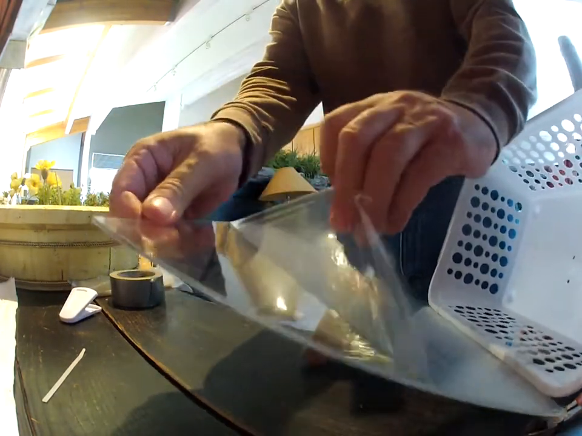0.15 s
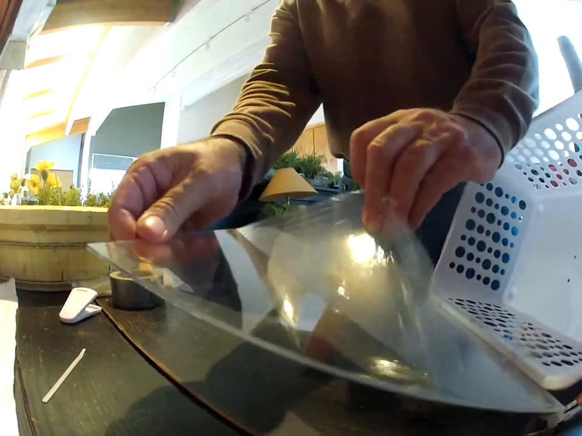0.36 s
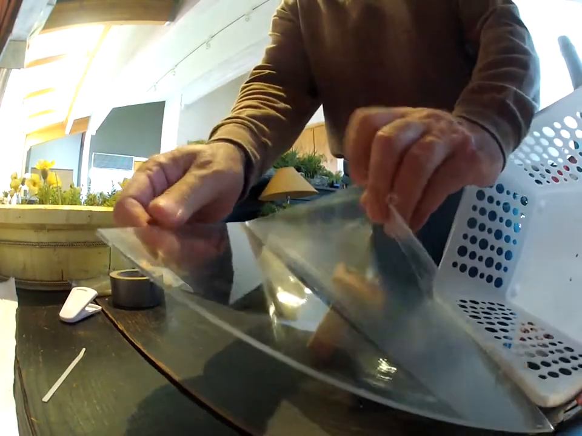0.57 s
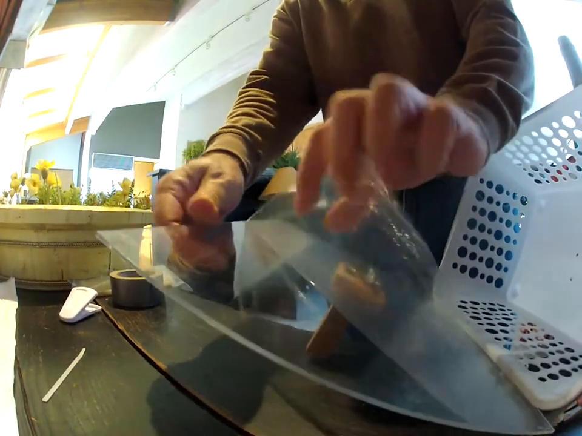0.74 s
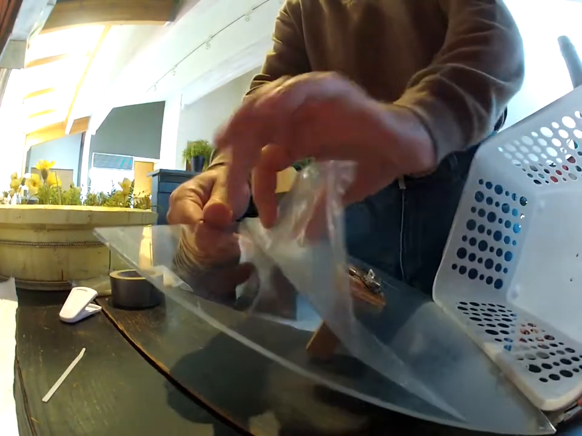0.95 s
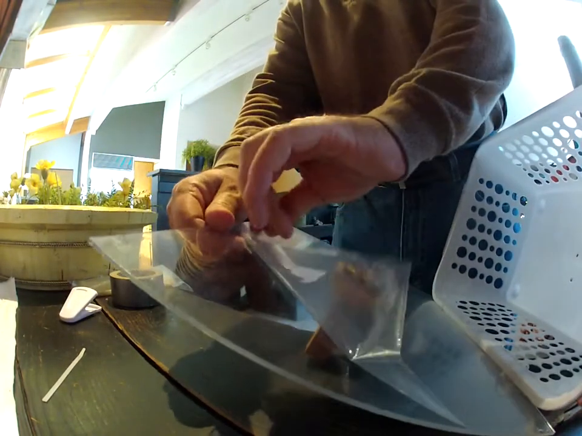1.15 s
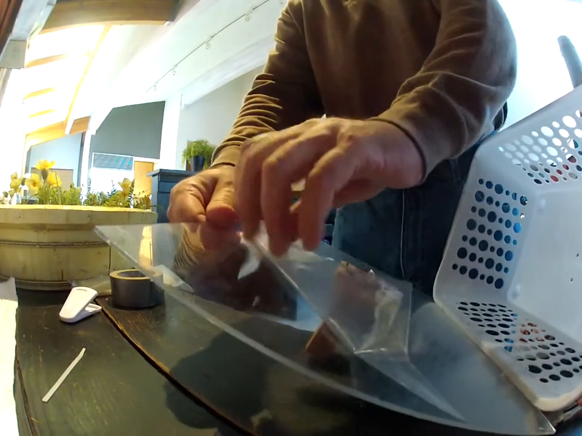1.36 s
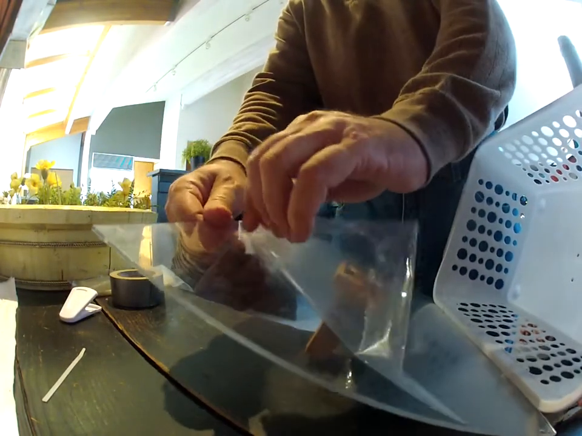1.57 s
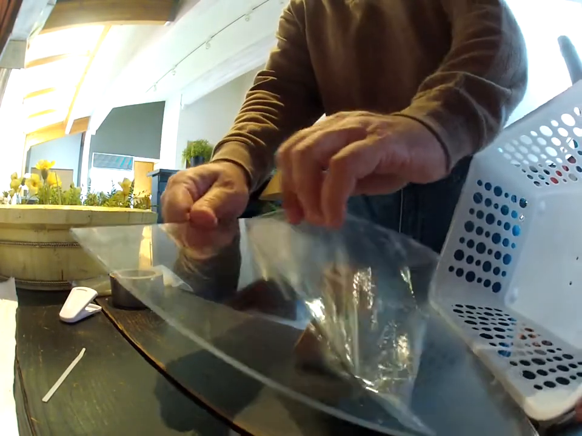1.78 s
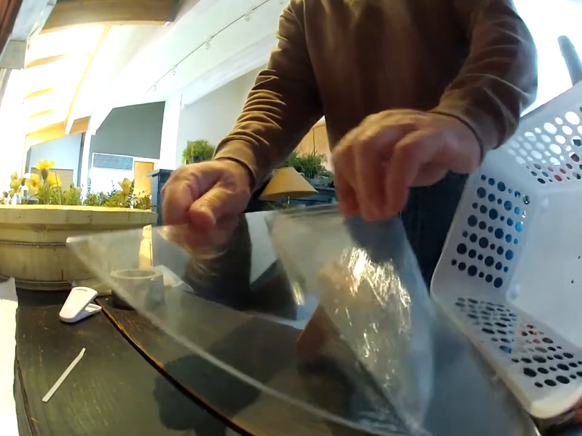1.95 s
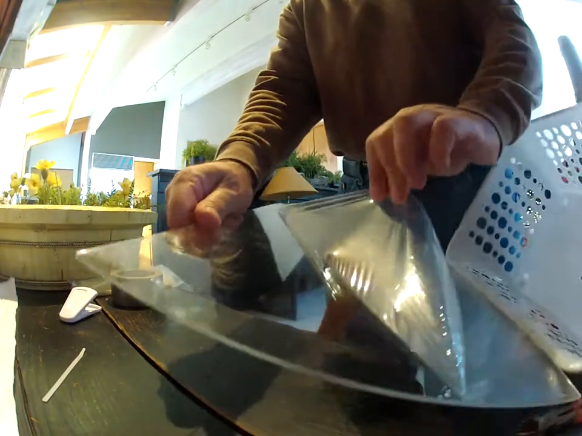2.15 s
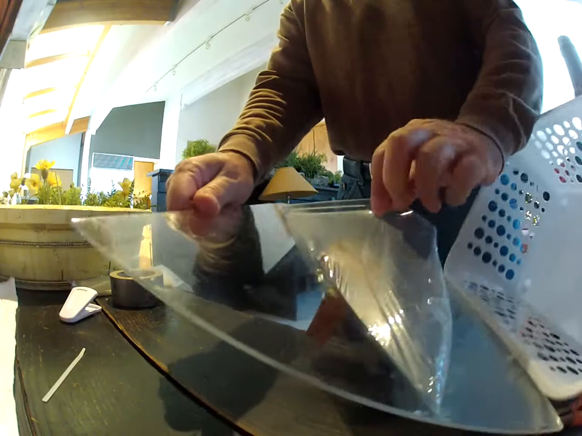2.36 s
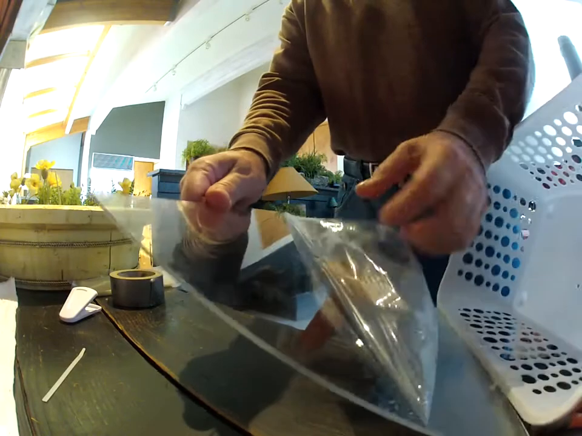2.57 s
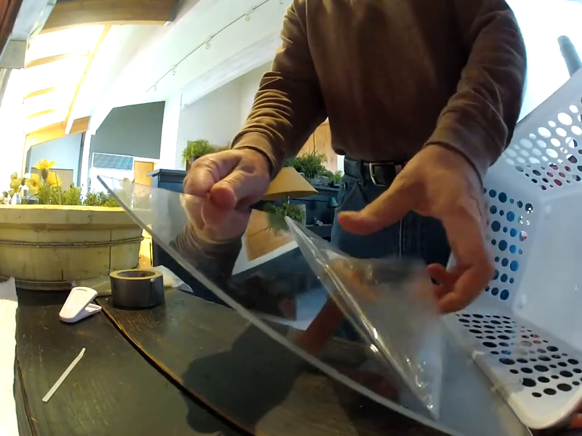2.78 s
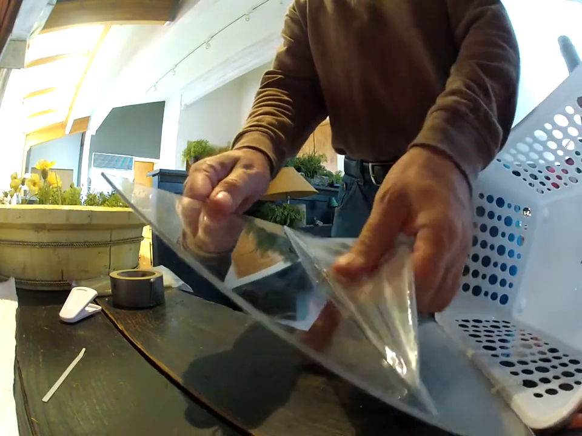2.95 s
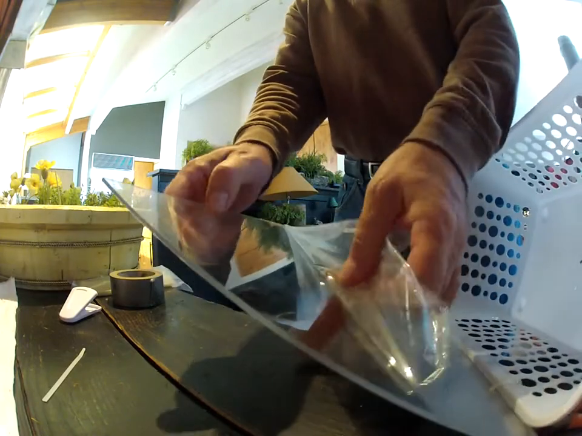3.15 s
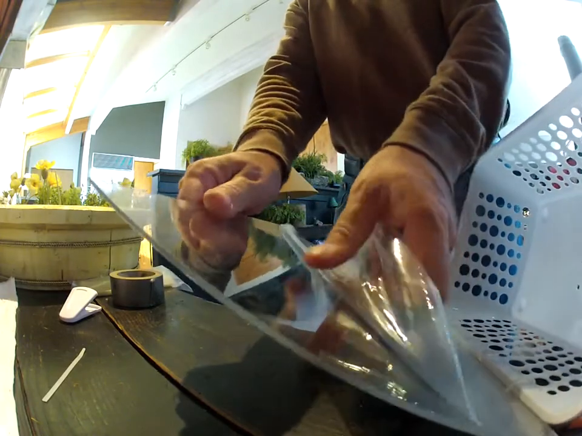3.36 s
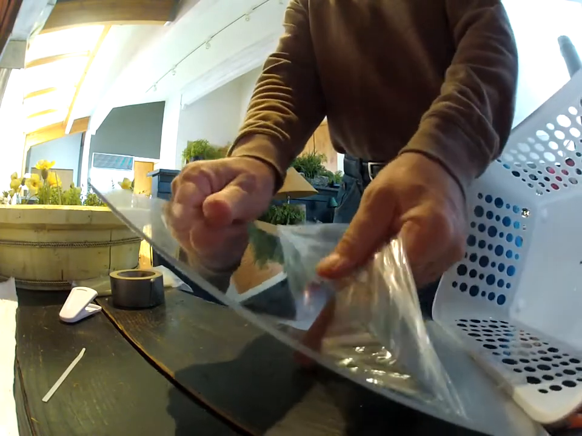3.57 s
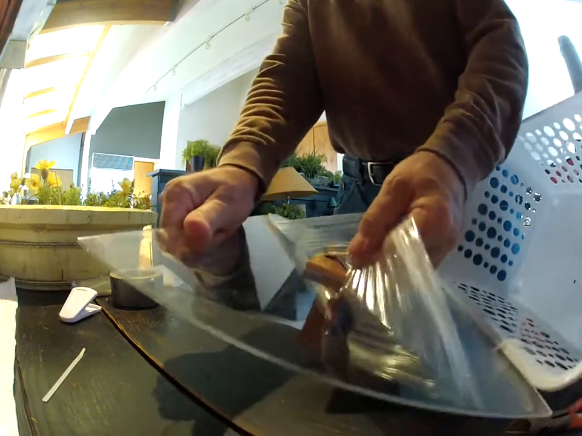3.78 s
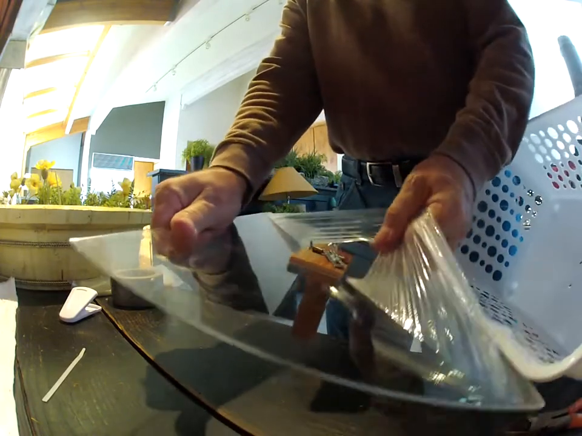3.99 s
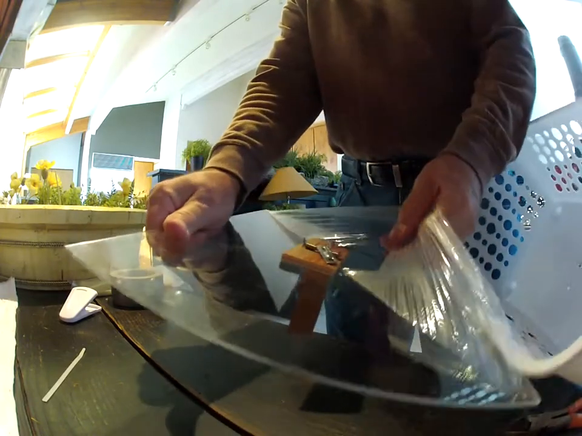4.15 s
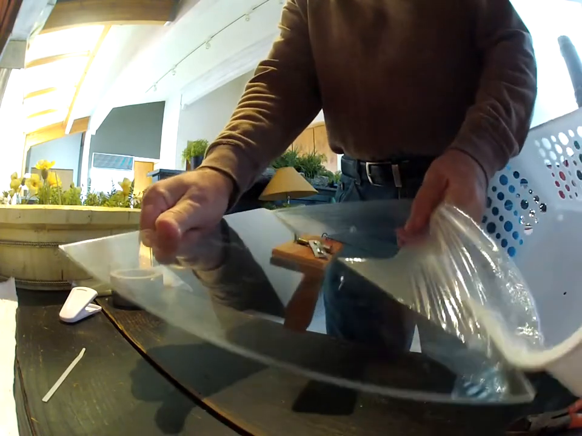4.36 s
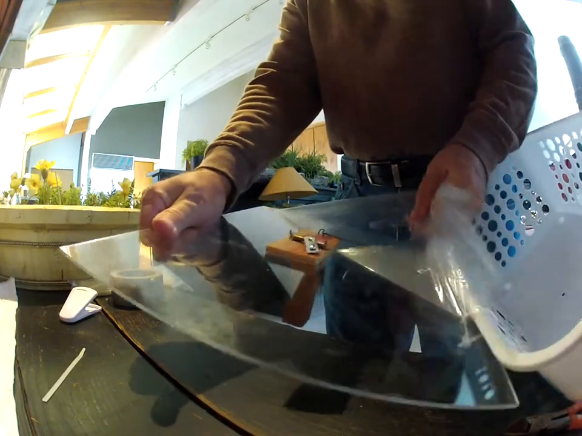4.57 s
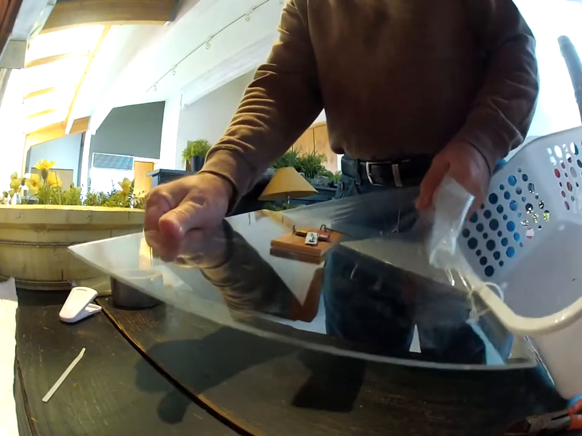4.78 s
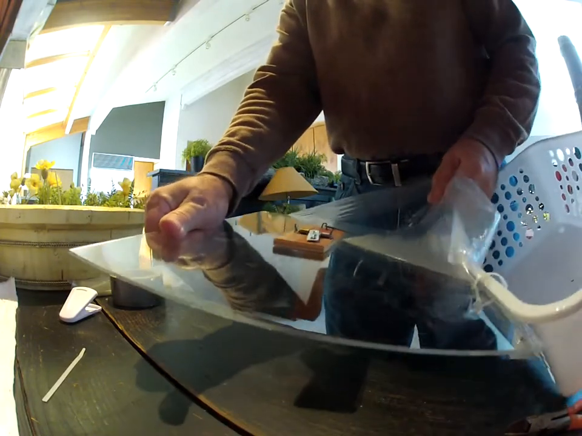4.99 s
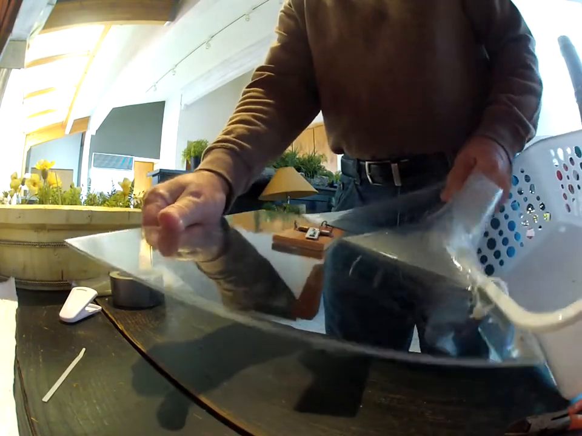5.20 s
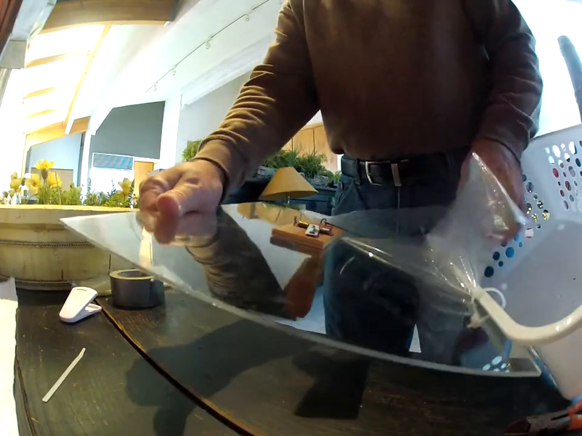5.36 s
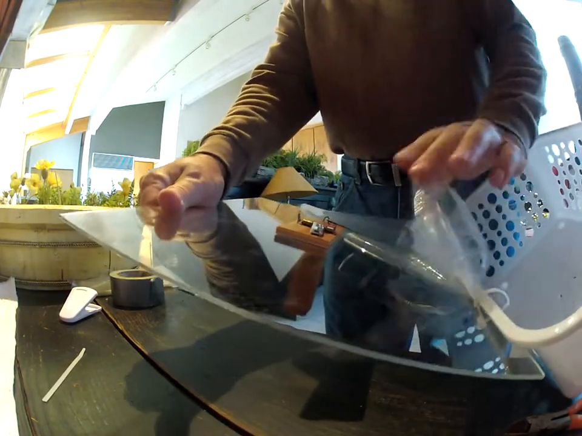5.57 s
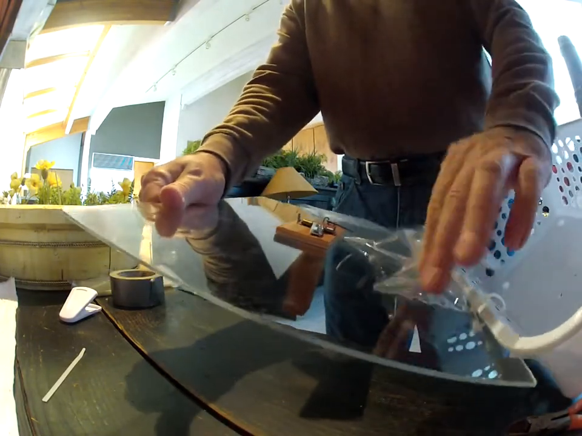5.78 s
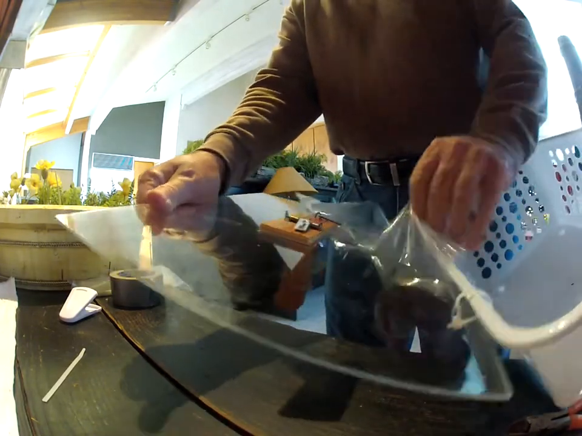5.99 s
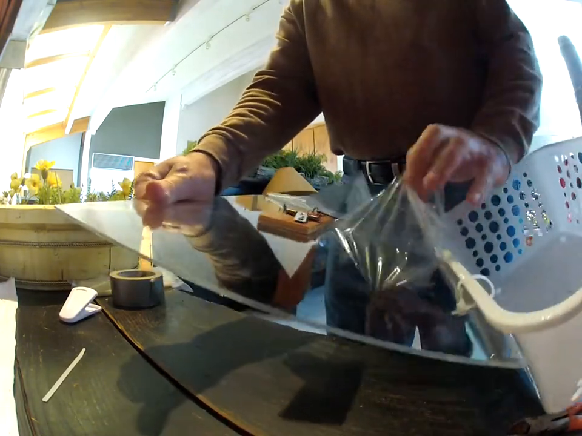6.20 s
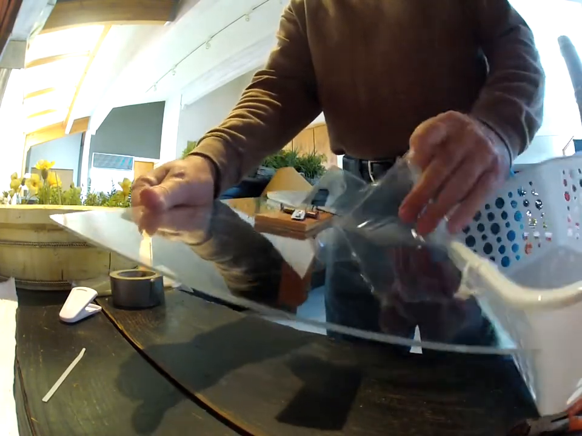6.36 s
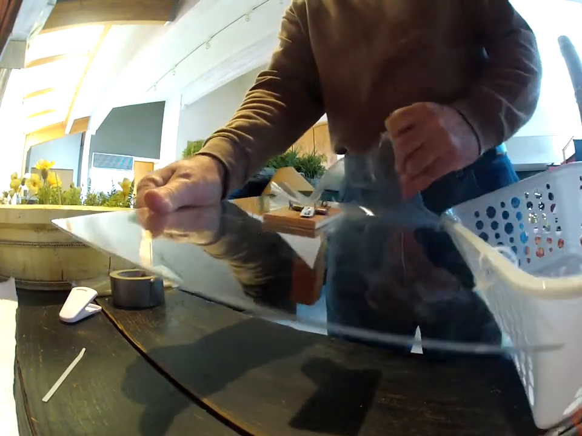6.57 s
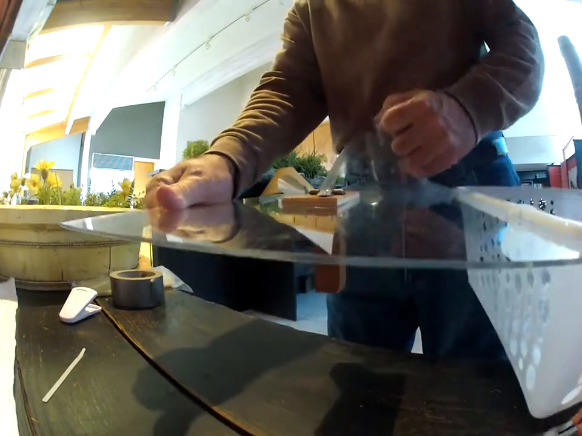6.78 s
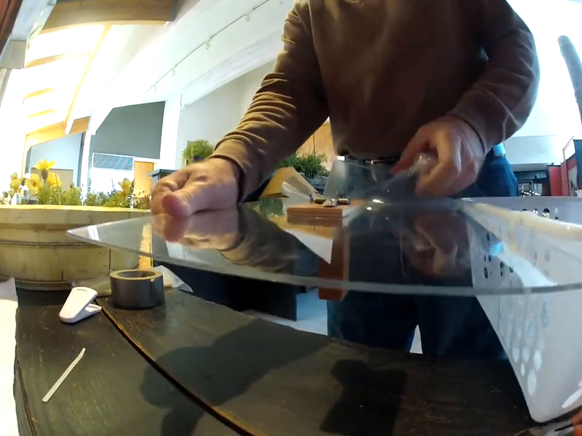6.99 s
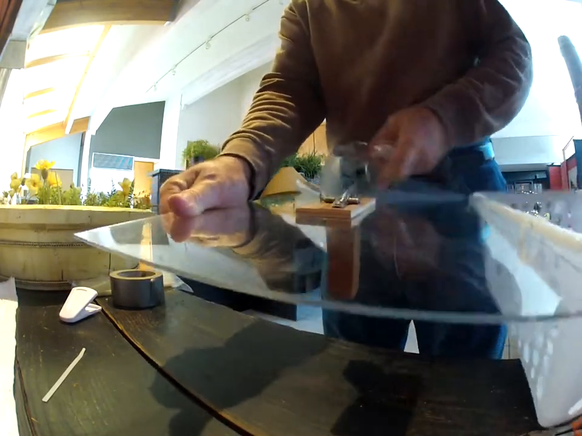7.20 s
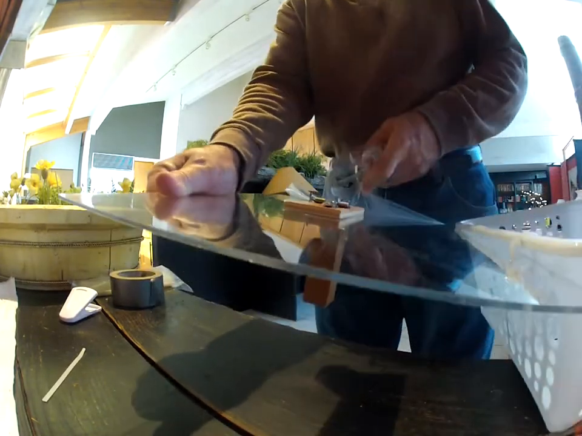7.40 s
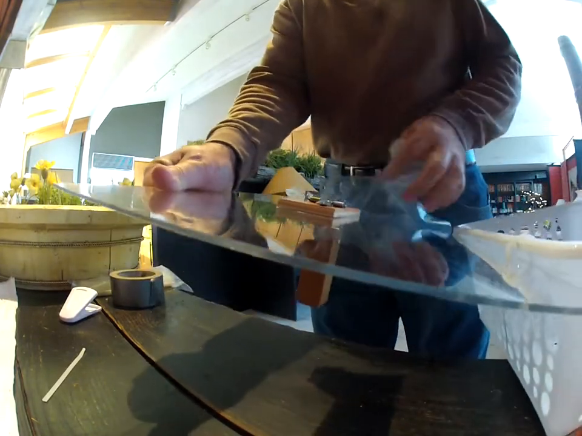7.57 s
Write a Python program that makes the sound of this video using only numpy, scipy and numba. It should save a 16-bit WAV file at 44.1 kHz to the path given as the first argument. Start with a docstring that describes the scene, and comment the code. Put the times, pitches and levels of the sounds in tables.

```python
"""Sharp cracks, low thumps and crinkling: a hand peels clinging film off a stiff plastic sheet in a room.
The glue lets go by stick-slip: each slip snaps and tears as filtered noise, thumps the taut film as
dying sines and rings the sheet's modes. Loose film crinkles as a random train of tiny noise grains.
The flexing sheet rumbles as resonant noise, and its knocks ring a basket with a small hard rattle.
Coupled delay lines reverberate, shaped noise hums, thin sines are the recorder's faint electronic whine."""
import sys
import numpy as np
from scipy import signal
from scipy.fft import rfft, irfft
from scipy.io import wavfile
from scipy.ndimage import uniform_filter1d
from numba import njit

SR = 44100
rng = np.random.default_rng(int(sys.argv[2]) if len(sys.argv) > 2 else 0)


def digitize_waveform(pressure):
    """Quantize a signal to 16-bit integers and store it at the path in sys.argv[1].

    Rows of a 2-D input are taken as channels; values are limited to [-1, 1].
    """
    field = np.atleast_2d(pressure).T
    bounded = np.clip(field, -1, 1)
    quanta = np.round(bounded * 32767).astype(np.int16)
    wavfile.write(sys.argv[1], SR, quanta)


N = 336924

FILM_BAND_HZ = (350, 7500)  # shared by cracks and crinkles


def undb(db):
    """Decibel law: 20 dB is a factor of ten in amplitude."""
    return 10 ** (np.asarray(db) / 20)


def level(x, db):
    """Normalisation: scale a signal to a given rms level in dB."""
    return x * undb(db) / np.sqrt(np.mean(x ** 2))


def band(x, lo_hz, hi_hz):
    """Band limiting: a Butterworth band-pass."""
    sos = signal.butter(2, [lo_hz, min(hi_hz, .45 * SR)], "band", fs=SR, output="sos")
    return signal.sosfilt(sos, x)


def resonate(x, hz, width):
    """Resonance: a two-pole peak with gain 1 at its centre, width in Hz."""
    return signal.lfilter(*signal.iirpeak(hz, hz / width, fs=SR), x)


def ring(x, modes):
    """Modal vibration: every push in x starts decaying sines."""
    out = 0
    for hz, db, t60 in modes:
        pole = np.exp(2j * np.pi * hz / SR - np.log(1000) / (t60 * SR))
        out = out + undb(db) * signal.lfilter([1], [1, -pole], x).imag
    return out


def add(track, s, piece):
    """Superposition: sum a piece into a track from s seconds on."""
    i = int(s * SR)
    track[i:i + len(piece)] += piece[:N - i]


def walk(rate):
    """Slow fluctuation: random levels held 1 / rate seconds, then slewed; spread near 1."""
    hold = int(SR / rate)
    steps = np.repeat(rng.standard_normal(N // hold + 1), hold)
    return 0.76 * uniform_filter1d(steps, hold)[:N]


# Thin steady tones. Each row: frequency in Hz, rms level in dB.
WHINE_TONES = [(5039, -75), (5087, -80), (6912, -88.5), (6961, -75)]


def electronic_whine():
    """Pure tones: steady sines are the recorder's faint electronic whine."""
    time = np.arange(N) / SR
    return sum(np.sqrt(2) * undb(db) * np.sin(2 * np.pi * hz * time) for hz, db in WHINE_TONES)


# Spectrum of the air and house noise.
# Each row: frequency in Hz, relative spectral density in dB per Hz.
AIR_SPECTRUM = [(15, -48), (25, 27.5), (140, 22.5), (368, 16.5), (1020, -4.5), (2060, -18), (4260, -70),
                (5140, -35.5), (6050, -16), (6920, -30), (15500, -36.5)]
AIR_DB = -51


def room_hum():
    """Shaped noise: air and house noise with a fixed spectrum and a slightly wandering level."""
    hz, db = np.transpose(AIR_SPECTRUM)
    grid = np.maximum(np.fft.rfftfreq(N, 1 / SR), 1)
    shape = undb(np.interp(np.log(grid), np.log(hz), db))
    air = irfft(rfft(rng.standard_normal(N)) * shape, N)
    return level(air, AIR_DB) * undb(0.63 * walk(8.8))


# After each slip film and sheet keep shaking: levels against the slip in dB, decay times in s
SETTLE_CRINKLE_DB, SETTLE_RUMBLE_DB, SETTLE_SWAY_DB = -41, -31.5, -34.5
SETTLE_CRINKLE_T60_S, SETTLE_SHEET_T60_S = 0.78, 0.63


def settling(rows, db, t60):
    """Energy decay: the powers left by the slips add up and die away exponentially."""
    power = np.zeros(N)
    for s, slip_db, _ in rows:
        add(power, s, np.array([undb(2 * (slip_db + db))]))
    decay = np.exp(-2 * np.log(1000) / (t60 * SR))
    return np.sqrt(signal.lfilter([1], [1, -decay], power))


# Loose film brushed or folded; a row sounds only if it ends after it starts.
# Each row: start in seconds, end in seconds, crinkle level in dB.
RUSTLE_SPANS = [(0.56, 0.548, -31), (0.707, 0.785, -47), (0.825, 0.837, -56), (0.97, 1.057, -60),
                (1.331, 1.379, -59), (1.434, 1.438, -45), (1.467, 1.526, -48.5), (2.266, 2.286, -49),
                (2.55, 2.6, -62), (2.734, 2.783, -52), (2.834, 2.922, -49), (3.073, 3.312, -55),
                (3.392, 3.458, -51), (3.502, 3.555, -41), (5.212, 5.365, -57), (5.575, 5.643, -46.5),
                (5.732, 5.798, -36), (5.863, 5.949, -31), (6.036, 6.073, -53), (6.248, 6.28, -42),
                (6.317, 6.348, -32), (6.377, 6.434, -42), (6.71, 6.732, -49), (6.784, 6.856, -49),
                (6.903, 6.955, -41), (6.997, 7.049, -39), (7.078, 7.106, -35.5), (7.248, 7.316, -59),
                (7.405, 7.654, -43)]


def crinkling(rows, steady):
    """Impulsive noise: loose film crinkles in tiny snaps of very uneven size, each a dying noise grain."""
    strength = steady + settling(rows, SETTLE_CRINKLE_DB, SETTLE_CRINKLE_T60_S)
    time = np.arange(N) / SR
    brushed = sum(undb(db) * ((time > start) & (time < end)) for start, end, db in RUSTLE_SPANS)
    chance = 600 / SR * undb(4.5 * walk(60))  # of a snap, per sample
    size = undb(4.0 * np.minimum(rng.exponential(size=N), 3.5))
    snaps = (rng.random(N) < chance) * size
    smear = np.exp(-np.arange(SR // 100) / (0.0016 * SR))
    grain = rng.standard_normal(N) * (signal.fftconvolve(snaps, smear)[:N] + 0.75)
    crinkle = level(band(grain, *FILM_BAND_HZ), 0)
    return (strength + uniform_filter1d(brushed, SR // 100)) * crinkle


# Broad flexing resonances of the sheet, each filtered a second time at twice the width.
# Each row: frequency in Hz, width of the first filter in Hz, relative level in dB.
FLEX_MODES = [(66.4, 29, -6), (169, 80, 11), (301, 260, 11.5), (640, 1100, 2.5)]
SWAY_HZ, SWAY_WIDTH_HZ = 117, 21.6  # lowest sheet mode
SWAY_DB = -4.5  # against the rumble, for steady handling
LEANS_S, LEAN_DB = 3.97, 5  # from then on the sheet leans on the basket and sways louder by this


def rumbling(rows, moved):
    """Forced vibration: irregular shoves drive the broad flexing and the lowest mode of the sheet."""
    time = np.arange(N) / SR
    shake = moved + settling(rows, SETTLE_RUMBLE_DB, SETTLE_SHEET_T60_S)
    sway = undb(SWAY_DB) * moved + settling(rows, SETTLE_SWAY_DB, SETTLE_SHEET_T60_S)
    sway = sway * undb(LEAN_DB * (time > LEANS_S))
    shove = rng.standard_normal(N) * undb(2.5 * walk(30))
    flexing = sum(level(resonate(resonate(shove, hz, width), hz, 2 * width), db)
                  for hz, width, db in FLEX_MODES)
    lowest = resonate(shove, SWAY_HZ, SWAY_WIDTH_HZ)
    return shake * level(flexing, 0) + sway * level(lowest, 0)


# Strength of the steady handling, interpolated between rows.
# Each row: time in seconds, crinkle level in dB, sheet rumble level in dB.
HAND_LEVELS = [(0, -57, -29), (.75, -69.5, -55), (1.099, -65.5, -59), (1.501, -69, -55), (2.2, -78, -49),
               (2.29, -52.5, -45.5), (2.6, -61.5, -57.5), (2.9, -63, -53), (3.2, -56, -48.5),
               (3.5, -50.5, -47), (5.3, -58.5, -49), (5.499, -66, -61), (5.8, -36, -60),
               (5.97, -43.5, -40.5), (6.22, -61, -45), (6.45, -40, -63), (6.6, -64, -56),
               (6.85, -47.5, -40), (6.98, -51, -51), (7.2, -45, -38.5), (7.46, -63, -58), (7.64, -56, -44)]


def handling(rows):
    """Amplitude modulation: the hand's strength scales the film's crinkle and the sheet's rumble."""
    s, *columns = np.transpose(HAND_LEVELS)
    time = np.arange(N) / SR
    steady, moved = (undb(np.interp(time, s, column)) for column in columns)
    return crinkling(rows, steady) + rumbling(rows, moved)


# Ringing modes of the basket.
# Each row: frequency in Hz, relative level in dB, time to fall 60 dB in seconds.
BASKET_MODES = [(121.1, -35, .12), (246, 1.5, 0.047), (361, 0, 0.091), (536, 1.5, 0.029), (650, 4, 0.029),
                (1033.5, -10, 0.039)]
# The sheet bumps the basket.
# Each row: start in seconds, relative blow level in dB, rattle level against the blow in dB.
BASKET_KNOCKS = [(1.514, -36, -40), (2.28, -32, -57), (2.89, -35.5, -36), (3.15, -35, -40),
                 (5.1716, -11, -20.5), (5.9376, -9.5, -23), (6.071, -31, -30), (6.632, -23.5, -40),
                 (6.78, -30, -40)]


def knocks():
    """Impact excitation: dull blows ring the basket's modes; something small and hard rattles along."""
    blow, rattle, thud = np.zeros((3, N))
    contact = np.hanning(16)
    chatter = np.exp(-np.arange(SR // 15) / (0.02 * SR))
    noises = rng.standard_normal((len(BASKET_KNOCKS), len(chatter)))
    for (s, db, rattle_db), noise in zip(BASKET_KNOCKS, noises):
        add(blow, s, undb(db) * contact / contact.sum())
        add(blow, s, undb(db - 29) * noise * chatter)
        add(thud, s, undb(db) * noise * (chatter ** 2 + .1 * chatter ** .3))
        add(rattle, s, undb(db + rattle_db) * noise * chatter)
    body = undb(-9) * ring(blow, BASKET_MODES)
    dull = undb(-5) * band(thud, 220.1, 948.4)
    return body + dull + band(rattle, 10500, 13500)


# Single slips of the glue line.
# Each row: start in seconds, relative crack level in dB, thump pitch in Hz.
SINGLE_SLIPS = [(.0005, -5, 196), (.0285, -4.5, 181), (.0537, -4.5, 187), (.0773, -3, 188),
                (.1019, -5, 190), (.1258, -6.5, 204), (.1498, -3.5, 199), (.1715, -5.5, 192),
                (.1989, -3.5, 196), (.2329, -4.5, 187), (.2679, -5.5, 176), (.2959, -5, 180),
                (.3223, -5, 180), (.3449, -23, 139), (.555, -34.5, 296), (.968, -44, 302),
                (1.436, -33.5, 300), (1.5313, -26.5, 174), (1.5695, -14.5, 269), (1.6233, -12, 262),
                (1.6318, -18, 310), (1.6406, -29, 264), (1.6668, -18.5, 444), (1.684, -33, 513),
                (1.6919, -25, 520), (1.7072, -15, 318), (1.7242, -8, 293), (1.7382, -4.5, 404),
                (1.7488, -8, 310), (1.7608, -12.5, 275), (1.7718, -6, 295), (1.8132, -6.5, 280),
                (1.8314, -3, 305), (1.8451, -4, 332), (1.8638, -7.5, 350), (1.8985, -9, 164),
                (1.9223, -9, 162), (1.9358, -8, 162), (1.9509, -8, 172), (1.9688, -5.5, 180),
                (2.2396, -24.5, 454), (2.543, -43.5, 400), (3.355, -40.5, 700), (3.452, -38, 400),
                (3.5379, -12.5, 580), (3.5469, -11, 324), (3.5587, -13, 318), (3.6226, -22, 720),
                (3.6336, -5, 660), (3.6555, -6, 428.6), (3.6819, -6.5, 282), (3.6988, -8, 257),
                (3.7404, -9, 375), (3.7566, -7, 384), (3.7721, -9, 370), (3.7861, -5.5, 216),
                (3.8348, -9.5, 327), (3.8492, -10.5, 377), (3.8604, -8.5, 206), (4.0047, -4.5, 183),
                (4.0244, -9, 230), (4.039, -5, 720), (4.0538, -8, 673), (4.0756, -5, 710),
                (4.1316, -10, 483), (4.2168, -3.5, 645), (4.2418, -6, 645), (4.262, -9, 610),
                (4.2735, -10, 750), (4.2855, -4, 520), (4.3078, -6.5, 724), (4.3236, -11.5, 720),
                (4.4424, -4.5, 555.5), (4.4677, -2.5, 487), (4.487, -9.5, 141), (4.4968, -9.5, 145.6),
                (4.5149, -10.5, 146), (4.5271, -9, 416), (4.5349, -13, 750), (4.5488, -15.5, 470),
                (4.676, -5.5, 456), (4.6967, -14.5, 413), (4.7301, -10.5, 520), (4.7894, -11.5, 480),
                (4.8134, -3.5, 705), (4.8277, -14.5, 330), (4.8444, -9.5, 840), (4.8559, -15, 157),
                (4.8731, -9.5, 780), (4.8968, -9.5, 730), (4.999, -9.5, 770), (5.0362, -9, 760),
                (5.0544, -11, 784), (5.0725, -14, 760), (5.0856, -13.5, 300), (5.0971, -15.5, 300),
                (5.6305, -30, 145), (5.7559, -19, 408), (5.7784, -25, 686), (5.8014, -20.5, 476),
                (5.8128, -24, 311.5), (5.8947, -18, 424), (5.9046, -16, 398.4), (5.9266, -16.5, 309.6),
                (6.272, -21, 403), (6.2803, -21.5, 474), (6.3185, -8.5, 740), (6.3384, -15, 155.1),
                (6.3714, -8, 729.6), (6.4549, -17, 680.7), (6.4622, -17, 726.5), (6.4733, -17, 715),
                (6.6454, -10, 399.4), (6.9064, -21.5, 143), (7.0138, -15.5, 416), (7.0328, -14.5, 301),
                (7.0816, -15.5, 180), (7.0914, -16, 151.2), (7.1002, -11, 762), (7.1538, -13.5, 251.7),
                (7.1736, -13, 299), (7.1862, -17.5, 342), (7.2061, -19, 337), (7.2783, -19.5, 716),
                (7.2926, -23.5, 410), (7.5359, -34, 150), (7.5549, -19.5, 284), (7.5871, -19.5, 373),
                (7.6276, -16.5, 267)]
# Runs of slips in nearly even steps. Each row: start in seconds, end in seconds,
# nominal slips per second, central relative crack level in dB, central thump pitch in Hz.
SLIP_RUNS = [(1.682, 1.781, 233, -16, 320), (1.856, 1.963, 181, -10.5, 206), (3.552, 3.623, 306, -11, 360),
             (3.745, 3.894, 140, -16, 321), (3.801, 3.829, 86, -7, 319.7), (3.879, 3.901, 75, -9, 332),
             (4.468, 4.543, 166, -16, 427), (5.986, 6.012, 273, -21, 425), (6.429, 6.452, 386, -20.5, 627),
             (6.484, 6.506, 201, -15.5, 480), (6.638, 6.646, 300, -22.5, 293),
             (6.666, 6.673, 230, -17.5, 185), (7.112, 7.188, 187, -20.5, 240)]


def peel():
    """Stick-slip: single slips, and runs of slips in nearly even steps of uneven strength and pitch."""
    rows = list(SINGLE_SLIPS)
    chances = rng.standard_normal((len(SLIP_RUNS), 3, 60))
    for (start, end, rate, db, hz), (pace, force, pitch) in zip(SLIP_RUNS, chances):
        steps = np.exp(.3 * pace)
        times = start + (np.cumsum(steps) - steps[0]) / rate
        for s, a, b in zip(times, force, pitch):
            if s < end:
                rows.append((s, db + 2.5 * a, hz * np.exp(.12 * b)))
    return rows


def bright(x):
    """Spectral colour: thin film's treble has a hump above the crack and a weaker shelf near the top."""
    return resonate(x, 6900, 3000) + undb(-10) * band(x, 11150, 15000)


def tearing(noise, t, tear_ms):
    """Non-Gaussian noise: the tear hisses with outward spikes, swells at once and dies in two stages."""
    spike_gain, spike_from = 1.96, 1.73  # spikes start at this many spreads of the noise
    spiked = noise + spike_gain * np.maximum(noise - spike_from, 0) ** 2
    decay = np.exp(-1000 * t / max(tear_ms, .3)) + 0.061 * np.exp(-t / 0.017)
    return spiked * decay * (1 - np.exp(-t / 0.00097))


def film_swing(hz, t):
    """Damped oscillation: the freed film makes one big swing, a longer ring and an overtone."""
    swing = np.sin(2 * np.pi * hz * t) * (np.exp(-t * hz / 0.39) + 0.47 * np.exp(-t * hz / 2.48))
    return swing + 0.28 * np.sin(2 * np.pi * 2.18 * hz * t) * np.exp(-t * hz / 0.79)


# Ringing modes of the stiff sheet.
# Each row: frequency in Hz, relative level in dB, time to fall 60 dB in seconds.
SHEET_MODES = [(113.3, -13.5, 0.051), (434, -10.5, 0.069), (742.5, -9.5, 0.099), (937, -8.5, 0.05),
               (1268, 0.5, 0.019), (1675, 7.5, 0.0065)]
# State of the held film, interpolated between rows. Each row: time in seconds, crack centre in Hz,
# relative thump level against the crack in dB, tearing decay constant in ms (at least 0.3),
# uncoloured share of the crack from 0 to 1.
FILM_STATE = [(0, 1800, -3.5, 3.5, 0.43), (.15, 1370, -2.5, 2.74, 0.42), (0.331, 1435, 2, 5.1, 0.24),
              (1.57, 3350, -26.5, 1.8, 0.62), (1.7, 2900, -11.5, 2.5, 0.49), (1.85, 1760, -0.5, 3.4, 0.37),
              (1.97, 1900, -8.5, 3.1, 0.4), (3.54, 2130, -5.5, 2.95, 0.38), (3.8, 1852, -0.5, 4.8, .35),
              (4.05, 1900, 2.5, 4.3, 0.31), (4.28, 1950, 2, 3.7, 0.27), (4.5, 1927, -3, 2.7, 0.47),
              (4.8, 2252, -7, 2.82, 0.44), (5.051, 3040, -4, 2.95, 0.52), (5.8, 2950, -12.5, 1.4, .2),
              (5.97, 2005, -2.5, 1.9, 0.25), (6.35, 2376, -12.5, 2.3, 0.43), (6.439, 2391, -32, 4.2, 0.23),
              (6.5, 1980, 0.5, 4, 0.3), (6.66, 2230, -8, 3.6, 0.28), (7.02, 2980, -10, 2.5, 0.08),
              (7.095, 4300, -18, 1.74, 0.15), (7.13, 1304, -8, 3.2, 0.23), (7.2, 1990, -10, 2.6, 0.21),
              (7.6, 2538, -7.5, 1.24, 0.23)]
CRACK_WIDTH = 1.0  # share of crack Hz
SLIP_TREBLE_DB = -7.5
# Narrow ring of the freed patch of film: level in dB, width and scatter of log pitch
PING_DB, PING_WIDTH, PING_SCATTER = -13.5, 0.062, 0.19  # width as a share of the ping's Hz


def slips(rows):
    """Sudden release: each slip snaps and tears, thumps the taut film and pushes the sheet."""
    crack, treble, thump, push = np.zeros((4, N))
    t = np.arange(SR // 10) / SR
    state_s, *states = np.transpose(FILM_STATE)
    noises = rng.standard_normal((len(rows), len(t)))
    for (s, db, hz), noise in zip(rows, noises):
        crack_hz, thump_db, tear_ms, plain = (np.interp(s, state_s, column) for column in states)
        tear = tearing(noise, t, tear_ms)
        add(treble, s, undb(db + SLIP_TREBLE_DB) * tear)
        add(tear, .0003, np.array([5.5]))  # the glue line snaps outward all at once
        coloured = resonate(tear, crack_hz, CRACK_WIDTH * crack_hz) * np.sqrt(2500 / crack_hz)
        add(crack, s, undb(db) * (coloured + max(plain, 0) * tear))
        ping_hz = crack_hz * np.exp(PING_SCATTER * noise[0])
        add(crack, s, undb(db + PING_DB) * resonate(tear, ping_hz, PING_WIDTH * ping_hz))
        add(push, s, undb(db) * tear[:SR // 500])
        # the film swings back a moment later
        add(thump, s + 0.00176, undb(db + thump_db) * film_swing(hz, t))
    cracks = undb(4) * band(crack, *FILM_BAND_HZ) + undb(5.5) * bright(treble)
    thumps = -undb(2.5) * band(thump, 73, 3400)  # minus: away from the microphone first
    return cracks + thumps + undb(-28) * ring(push, SHEET_MODES)


@njit
def walls(x, lags, gain, damp):
    """Reverberation: eight delay lines feed each other and grow duller on every round."""
    line, soft, out = np.zeros((8, 4096)), np.zeros(8), np.zeros(len(x))
    for i in range(len(x)):
        total = 0.
        for k in range(8):
            soft[k] += (1 - damp) * (gain[k] * line[k, (i - lags[k]) & 4095] - soft[k])
            total += soft[k]
            out[i] += soft[k] * (1 - 2 * (k % 2))
        for k in range(8):
            line[k, i & 4095] = x[i] + soft[k] - total / 4
    return out


ROOM_T60_S, ROOM_DAMP, ROOM_DB = .45, 0.11, -25.5  # decay before damping, treble loss 0-0.9, level


def scene():
    """Superposition: near sources, reverberation, hum and whine, alike in both channels."""
    rows = peel()
    near = slips(rows) + knocks() + handling(rows)
    lags = np.array([331, 487, 641, 839, 1063, 1327, 1601, 1973])  # samples
    gain = undb(-60 * lags / SR / ROOM_T60_S)
    room = walls(near, lags, gain, np.clip(ROOM_DAMP, 0, .9))
    mono = near + undb(ROOM_DB) * room + room_hum() + electronic_whine()
    return np.array([mono, mono])


# Bands cancelled by the microphone port.
# Each row: centre in Hz, width in Hz, depth from 0 to 1.
PORT_NOTCHES = [(6050, 1200, .93), (12050, 450, .93)]
TOP_HZ = 15500


def record(dry):
    """Transducer response: the port cancels bands and loses deep bass, loud snaps clip, the top is cut."""
    for hz, width, depth in PORT_NOTCHES:
        dry = dry - min(depth, 1) * resonate(dry, hz, width)
    dry = signal.sosfilt(signal.butter(1, 45, "high", fs=SR, output="sos"), dry)
    clipped = .9 * dry / (1 + dry ** 6) ** (1 / 6)
    return signal.sosfilt(signal.ellip(10, .1, 90, TOP_HZ, fs=SR, output="sos"), clipped)


dry = scene()
out = record(dry)
digitize_waveform(out)
```